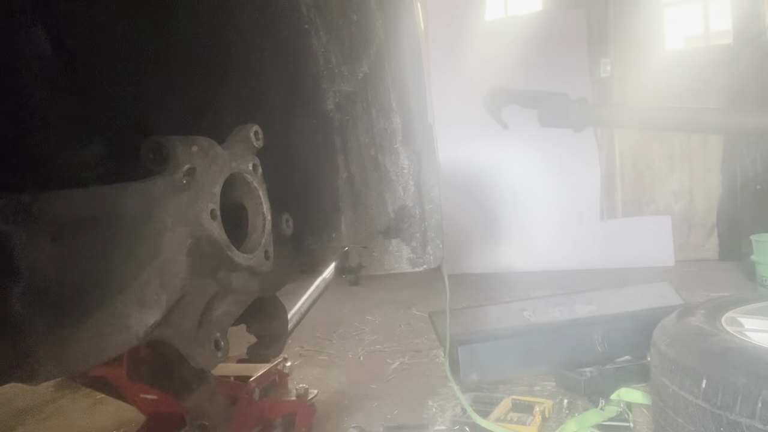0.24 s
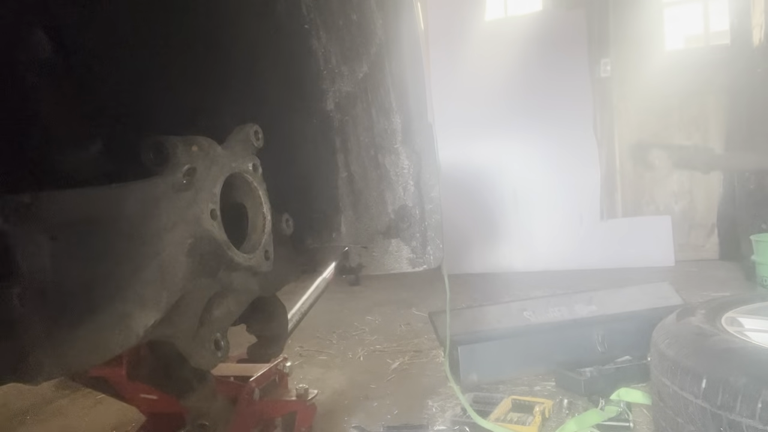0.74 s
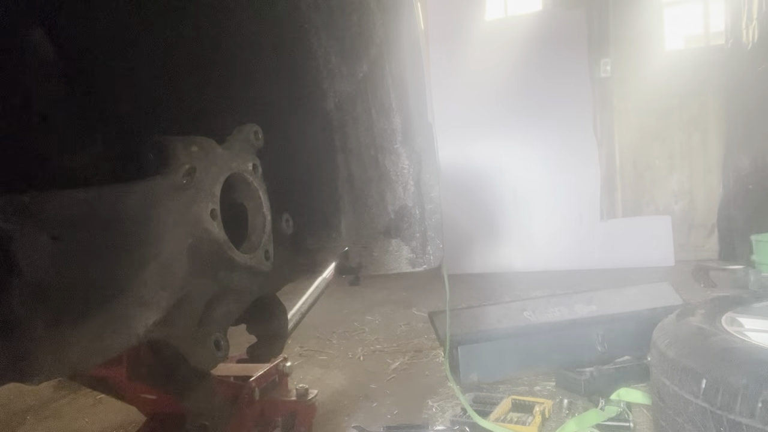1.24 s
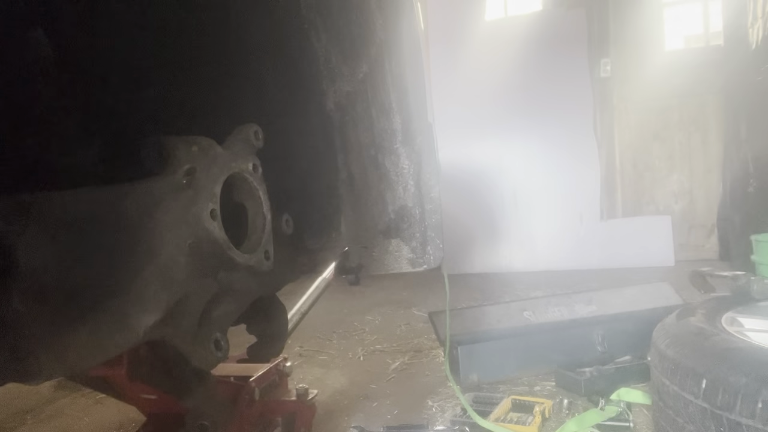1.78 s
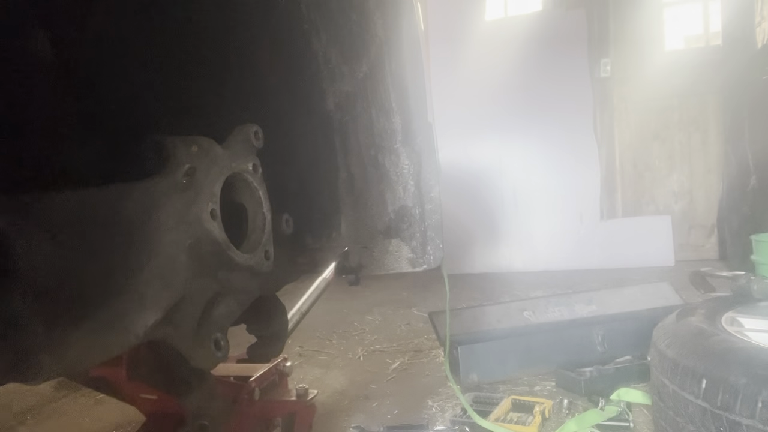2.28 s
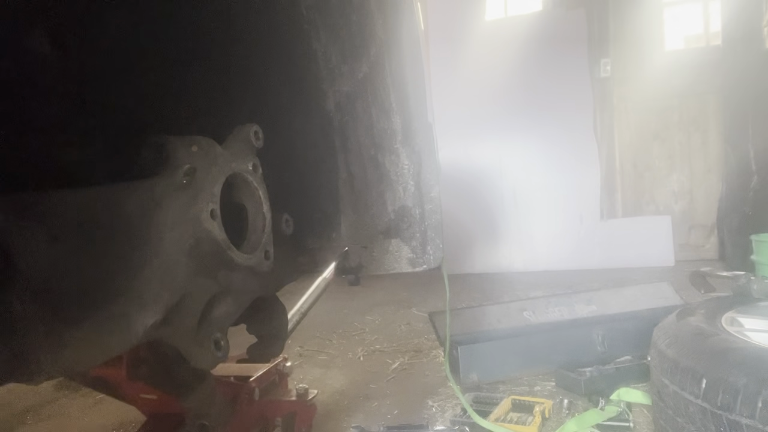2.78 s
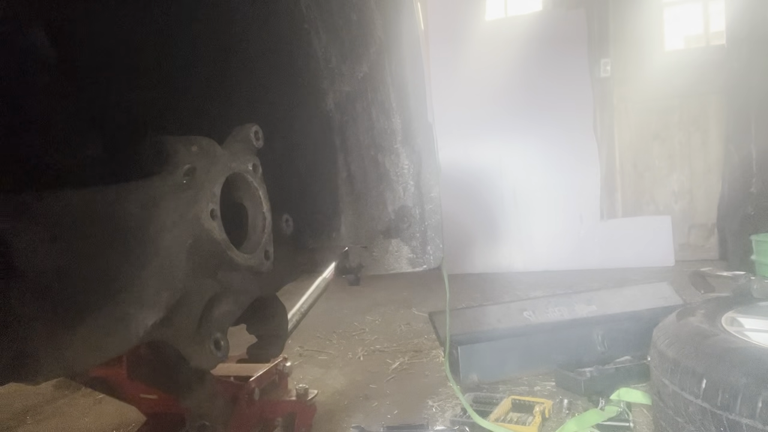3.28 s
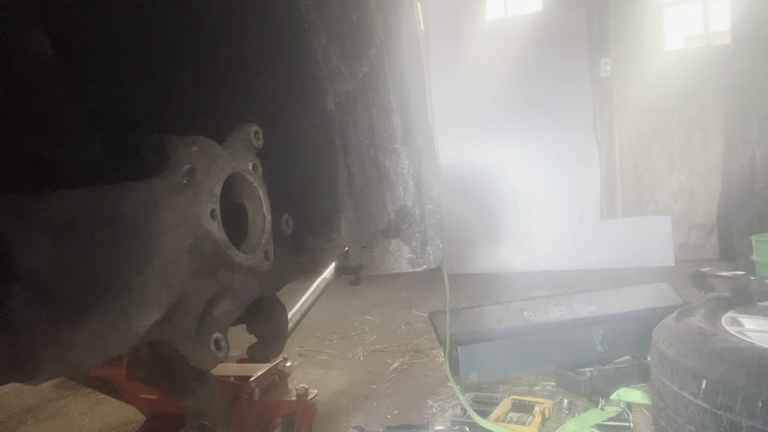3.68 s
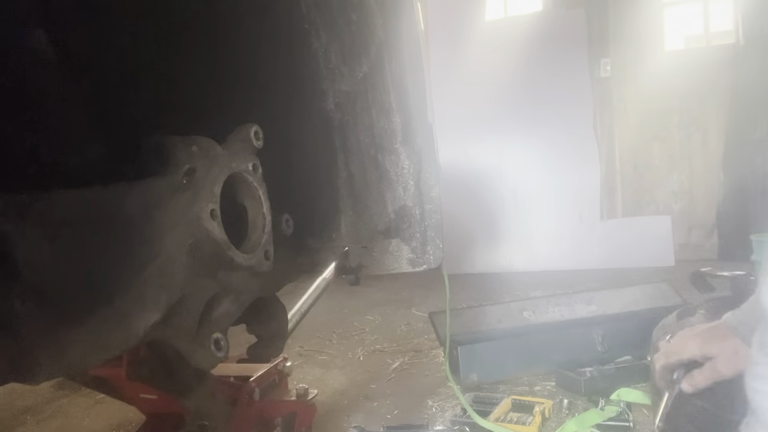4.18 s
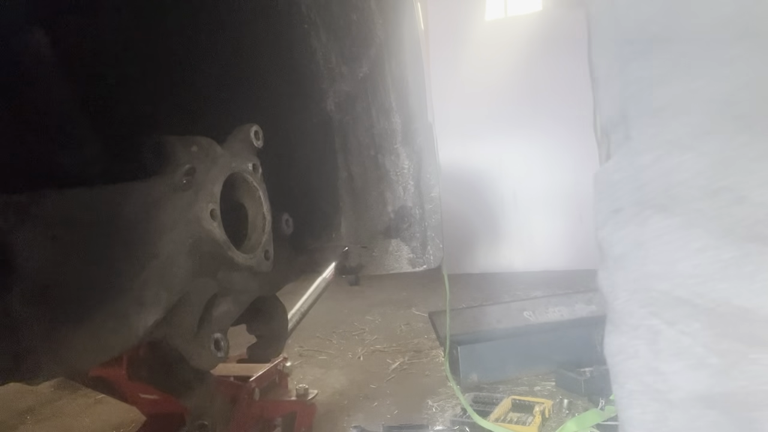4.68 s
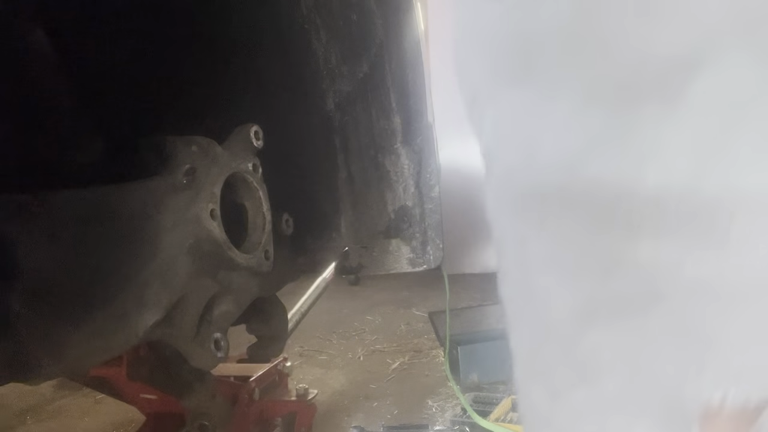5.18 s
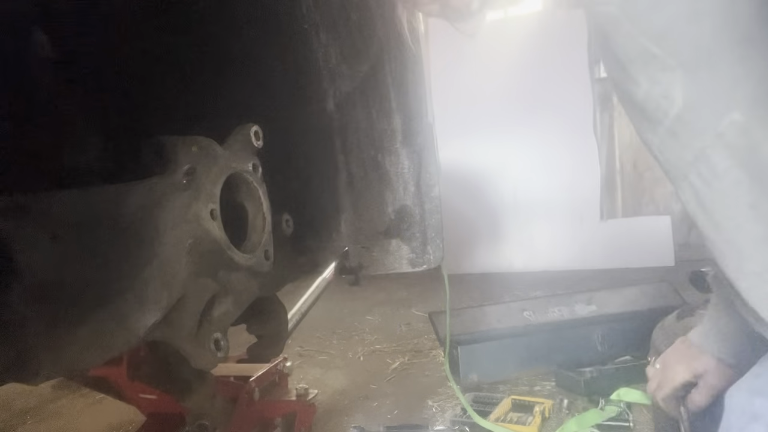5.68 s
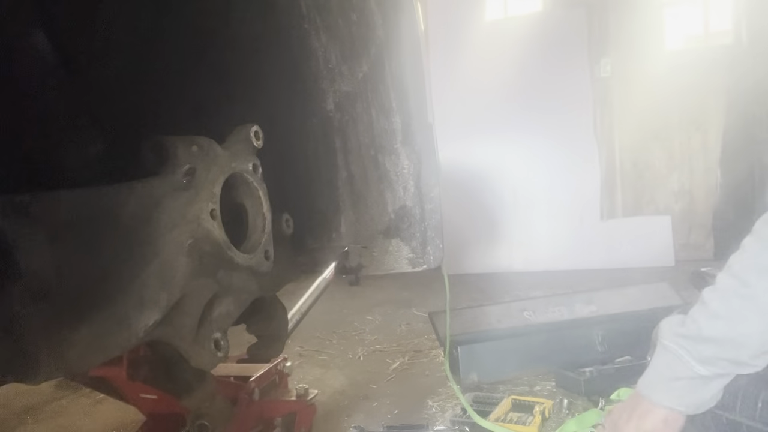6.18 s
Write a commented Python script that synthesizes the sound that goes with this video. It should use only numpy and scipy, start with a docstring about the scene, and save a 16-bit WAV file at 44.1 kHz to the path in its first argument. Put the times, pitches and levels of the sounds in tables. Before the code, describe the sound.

Home garage, close stereo microphone, short reverberation. At 0 s the bright steel ring of a blow struck just before is already dying, with five hard, low-pitched shaft knocks crowding the first 0.2 s and a small clatter among them. By 0.5 s only faint low rumble and shuffling remain. From 1.15 to 1.55 s the tool lands among loose parts: a grainy metallic clatter, with a hollow box thump near 1.33 s and a dull bump at 1.7 s. Quiet cloth sweeps and tiny ticks continue. Around 3.9-4.0 s the shaft is bumped, one firm knock with a low thud. Clothing rustle and rumble grow from 4.4 s, strongest around 5.2-5.7 s, crisp and close. A faint clink at 6.09 s precedes loud, sharp clanks at 6.19, 6.21 and 6.29 s, high steel rings fluttering and chattering until the abrupt end around 6.45 s.

```python
"""The ring of a slide hammer's last blow dies away in a home garage; its shaft bounces and the tool lands
among loose parts. Clothes rustle, the shaft is bumped, and the lifted tool's steel pieces clank at the end.
Metal is decaying sines, knocks are pulses and noise bursts, and chatter is random contacts through mode crowds.
Cloth and rumble are coloured flickering noise. A garage tail is added, then two microphone ports
give the lows and mids their width while both sides share one treble path."""
import sys
import numpy as np
from scipy import signal
from scipy.fft import rfft, irfft
from scipy.io import wavfile
from scipy.ndimage import uniform_filter1d

SR = 44100
rng = np.random.default_rng(int(sys.argv[2]) if len(sys.argv) > 2 else 0)


def store_wav(level_fs):
    """Save 16-bit WAV to argv[1]."""
    pcm = np.round(np.clip(np.atleast_2d(level_fs), -1, 1) * 32767)
    wavfile.write(sys.argv[1], SR, pcm.T.astype(np.int16))


N = 284004

# knocks on the shaft: t/s, pulse level/dB, pulse f/Hz, ring drive/dB, thud level/dB,
# start of the pair's beat/turns (0 loud, .5 silent)
KNOCKS = [(0.037, -14, 620, -24, -28.5, 0.033), (0.0857, -16, 614, -28, -46, 0.18),
          (0.1134, -15.5, 637, -23.5, -30, 0.87), (.149, -22, 860, -39, -45, 0.3),
          (0.1939, -23, 582, -40, -40.5, 0.043), (3.8775, -28, 673, -50.5, -43, .45),
          (3.967, -14.5, 827, -28, -29.5, 0.39), (3.987, -27.5, 605, -65, -45, 0.059)]
# spectrum of a hard crack: f/Hz, relative level/dB
CRACK = [(300, -3), (1000, 4), (2500, 3.5), (5000, 0), (8000, 0.5), (12000, -19), (16000, -15)]
# spectrum of floor and bench shaken by a knock: f/Hz, relative level/dB
THUD = [(40, -10), (100, -3), (300, -2), (700, -4), (1500, -15), (4000, -36)]
# likeness of the sound at the two ports: f/Hz, likeness (0 to 1)
SAME = [(60, 1), (300, 0.97), (700, 0.86), (1200, 0.083), (3000, 0.067), (6000, 0.19)]
# modes of the tool's steel pieces, each: f/Hz, relative level/dB, t60/s
HOOK = [(4230, 0, .04), (5130, -9, .04), (8600, -13, .03)]
COLLAR = [(9920, 0, .15), (11134, -8, .13), (11076, -9, .1), (10078, -10, .1), (7500, -12, .05),
          (14300, -18, .1)]
WEIGHT = [(6558, 0, .5), (6493, -20, .4), (6898, -25, .3)]
HANDLE = [(2419, 0, .9)]
TIP = [(12423, 0, .2)]
JAW = [(7197, 0, .5), (8005, -4, .5), (11189, -14, .6), (11614, -12, .5), (3110, -16, .25),
       (1036, -12, .08), (14900, -20, .2)]
ROD = [(9853, 0, .4), (7001, -1, .2), (7030, -2, .4), (12878, -4, .2), (4907, -9, .3), (5338, -12, .3),
       (13950, -16, .1)]
PIN = [(5140, 0, .06), (4574, -2, .08), (5420, -8, .05), (6300, -8, .05)]


def amp(db):
    """Turns decibels into an amplitude factor."""
    return 10 ** (np.asarray(db) / 20)


def evened(x):
    """Scales x to an RMS of one."""
    return x / np.sqrt(np.mean(x ** 2) + 1e-20)


def read(points, hz):
    """Reads a curve between its points along a logarithmic frequency axis."""
    f, value = np.transpose(points)
    return np.interp(np.log(hz + 1), np.log(f + 1), value)


def add(mix, s, sound):
    """Adds a sound into the mix at s seconds, cut at the end of the mix."""
    part = mix[round(s * SR):][:len(sound)]
    part += sound[:len(part)]


def shaped(x, gain):
    """Filters x by a function of frequency."""
    n = x.shape[-1]
    return irfft(rfft(x) * gain(np.fft.rfftfreq(n, 1 / SR)), n)


def wavering(count):
    """Smooth random curve of RMS one that changes over several milliseconds."""
    smooth = uniform_filter1d(rng.standard_normal(count), size=250)
    return evened(uniform_filter1d(smooth, size=250))


def ring(modes, length, spread_db, waver_db=0):
    """Decaying sines of random phase; the landing spot changes each level and a loose part wavers as it rocks."""
    t = np.arange(round(length * SR)) / SR
    luck = rng.random((len(modes), 2))
    out = 0
    for (hz, db, t60), (phase, spot) in zip(modes, luck):
        # every mode is lowered by 3 to 5 times the spread
        level_db = db + spread_db * (2 * spot - 5.0) + waver_db * wavering(len(t)) - 60 * t / t60
        out = out + amp(level_db) * np.sin(2 * np.pi * (hz * t + phase))
    return out


def burst(t60, colour=CRACK, rise=.0001, size=26460):
    """Coloured noise that swells briefly and dies away."""
    t = np.arange(size) / SR
    noise = evened(shaped(rng.standard_normal(len(t)), lambda f: amp(read(colour, f))))
    return noise * amp(-60 * t / t60) * (1 - np.exp(-t / rise))


def jangle(span_hz, t60, count=50):
    """A dense crowd of short modes at random pitches within a span, scaled to energy 1."""
    place, drop = rng.random((count, 2)).T
    low, high = span_hz
    modes = [(low * (high / low) ** a, -14 * b, t60) for a, b in zip(place, drop)]
    body = ring(modes, .25, 0)
    return body / np.linalg.norm(body)


def background():
    """Rumble and shuffling lie low after the ringing blow, then grow slowly, with cloth sweeps.
    The noise flickers in grains and patches."""
    # bed: t/s, rumble level/dB, shuffling level/dB, faint rustle level/dB
    bed = [(.4, -65, -76.5, -99), (.6, -67, -70.5, -91), (1.1, -66, -69, -82), (1.7, -60, -68.5, -89.5),
           (2.0, -59.5, -66.5, -90), (2.31, -58.5, -61, -84), (2.75, -60, -66, -92), (3.3, -60, -65, -80.5),
           (3.8, -60, -68.5, -76), (4.2, -58, -65.5, -77), (4.75, -56.5, -63.5, -75),
           (5.2, -51.5, -62.5, -68.5), (5.55, -51, -52.5, -59), (5.9, -54, -56, -60),
           (6.07, -53, -57.5, -64.5)]
    # spectra: f/Hz, relative level/dB
    rumble = [(20, -60), (32, -30.5), (45, 1.5), (65, 10), (110, -10.5), (160, -9.5), (300, -11),
              (500, -19.5), (900, -16.5), (3000, -59.5)]
    shuffling = [(150, -22.5), (400, 2.5), (1000, -2.5), (2500, -4), (5000, -11), (8000, -12.5),
                 (16000, -36.5)]
    rustling = [(1000, -36.5), (3000, -9), (6000, -1), (8000, 1.5), (11000, -0.5), (14000, -3.5),
                (16000, -6)]
    # depth of the time-frequency patches: rumble/dB, shuffling/dB, rustle/dB
    patch_depths = (1.4, 2., 0)
    frames, hz = N // 256 + 5, np.fft.rfftfreq(1024, 1 / SR)
    s, *levels = np.transpose(bed)
    t, out = np.arange(N) / SR, 0
    gains = [np.hypot(amp(np.interp(t, s, db)), swept) for db, swept in zip(levels, sweeps())]
    same = np.clip(read(SAME, hz), 0, 1)[:, None]
    layers = zip((rumble, shuffling, rustling), gains, (.8, 1.8, 2.5), patch_depths)
    for colour, gain, flicker_db, patch_db in layers:
        a, b, c, d, patches = rng.standard_normal((frames, 513, 5)).T
        patches = uniform_filter1d(patches, size=10, axis=0)
        patches = evened(uniform_filter1d(patches, size=3, axis=1))
        flicker = evened(uniform_filter1d(rng.standard_normal(frames), size=2))
        right = a + 1j * b
        left = same * right + np.sqrt(1 - same ** 2) * (c + 1j * d)
        z = np.array([left, right])
        z *= amp(read(colour, hz)[:, None] + flicker_db * flicker + patch_db * patches)
        noise = signal.istft(z, nperseg=1024, noverlap=768)[1][:, :N]
        out = out + gain * evened(noise)
    return out


def last_blow():
    """Steel modes and a noisy wash, both still dying from a blow just before the start."""
    # modes: f/Hz, relative level/dB, t60/s
    modes = [(1218, -5, .27), (1330, -11, .35), (1598, -3, .25), (1960, -12, .3), (2099, -14, .3),
             (2295, -16, .3), (3101, -13, .35), (3402, -13, .3), (3650, -14, .3), (4460, -14, .25),
             (5650, -12, .25), (7009, -12, .3), (7200, -6, .3), (8007, -9, .38), (9845, -8, .2),
             (10780, -16, .25), (11189, -17, .45), (11603, 0, .4), (14600, -20, .3)]
    ring_db, wash_db, wash_t60 = -25.5, -32.5, 0.46  # dB, dB, s
    out = np.zeros(N)
    tones = amp(ring_db) * ring(modes, .6, 0, 0.88)
    add(out, 0, tones + amp(wash_db) * burst(wash_t60))
    return out


def shaft():
    """Each knock: a pulse of a cycle or two, a thud after it, a tick, and the higher bending modes of the bar."""
    # bending modes: f/Hz, relative level/dB, t60/s
    bending = [(3100, -17, .13), (3663, -17, .1), (4890, -14, .24), (6562, -7, .07), (8637, -2, .11),
               (10850, -8, .09), (12031, -16, .1), (14360, -16, .1)]
    out, t = np.zeros(N), np.arange(400) / SR
    for s, db, hz, ring_db, thud_db, _ in KNOCKS:
        cycles = hz * t - 1.2
        add(out, s, amp(db) * np.cos(2 * np.pi * cycles) * np.exp(-(cycles / 0.58) ** 2))
        add(out, s + 0.00209, amp(thud_db) * burst(0.12, THUD, 0.0012, size=12000))
        add(out, s + .0008, amp(ring_db) * ring(bending, .25, 1.2, 3.5))
        add(out, s + .0008, amp(ring_db - 3) * burst(.008, size=1000))
    return out


def pair():
    """The shaft's lowest bending mode is a close pair that beats, and is muted once the shaft settles."""
    # the pair: f/Hz, split/Hz, level against the ring drive/dB, t60/s
    pair_hz, split_hz, pair_db, t60 = (2572, 8.5, -12, .5)
    free_s, settled_db = .095, -12  # rings free this long, then is turned down on its rest
    out, t = np.zeros(N), np.arange(SR // 2) / SR
    muted_db = settled_db * np.clip((t - free_s) / .008, 0, 1)
    for s, _, _, ring_db, _, turns in KNOCKS:
        beat = np.cos(np.pi * (split_hz * t + turns)) * np.sin(2 * np.pi * pair_hz * t)
        level_db = ring_db + pair_db + muted_db + 3 * wavering(len(t)) - 60 * t / t60
        add(out, s, amp(level_db) * beat)
    return out


def parts():
    """Each clatter is a grainy jostle that shakes the known modes of the loose parts and a crowd of small ones."""
    # modes of the loose parts: f/Hz, relative level/dB, t60/s
    part_modes = [(1518, -13, .06), (2309, -7, .07), (2592, -6, .07), (2756, -10, .05), (3302, -6, .05),
                  (3550, -5, .04), (3660, -9, .07), (4290, -8, .05), (4500, 0, .09), (4760, -5, .06),
                  (5394, -8, .08), (5500, -3, .12), (5857, -6, .18), (6100, -12, .12), (7200, -13, .05),
                  (6761, -2, .06), (7776, -9, .05), (9685, -13, .16), (10200, -13, .2), (11560, -7, .14),
                  (12040, -12, .12)]
    # clatters: t/s, drive/dB, crack level against the drive/dB, t60 of the jostling/s
    clatters = [(.122, -39, -9, .06), (1.1459, -40, -7, 0.061), (1.1579, -39.5, -9, 0.032),
                (1.1712, -34, -6, 0.036), (1.186, -41, 1, 0.042), (1.1979, -31, -4, 0.05),
                (1.215, -47, 9, 0.087), (1.2292, -41, 0, 0.025), (1.247, -45.5, 3.5, 0.062),
                (1.275, -50.5, -2, 0.085), (1.3387, -37.5, -22, 0.096), (1.382, -43.5, 5, 0.052),
                (1.4853, -35, 0.5, 0.039), (1.5081, -47.5, 8, 0.068), (1.5531, -51, -6, 0.09)]
    # small modes of the heap, new at every clatter: Hz, s, dB
    heap_hz, heap_t60, heap_db = (2200, 12500), 0.07, -2.5
    out = np.zeros(N)
    for s, db, crack_db, t60 in clatters:
        jostle = burst(t60, CRACK, .0007, size=9000)
        body = ring(part_modes, .25, 3, 3.5)
        grain = evened(uniform_filter1d(rng.standard_normal(len(jostle)), size=40))
        jostle = jostle * amp(4.0 * grain - 1.5)
        body = body / np.linalg.norm(body) + amp(heap_db) * jangle(heap_hz, heap_t60)
        add(out, s, amp(db) * signal.fftconvolve(jostle, body))
        add(out, s, amp(db + crack_db) * jostle)
    return out


def sweeps():
    """Gains for rumble (none), shuffling and rustle: each sweep of cloth rises, holds and fades."""
    # strokes of cloth: start t/s, time to the fade/s, rustle level/dB, shuffling level/dB
    strokes = [(0.777, 0.13, -80, -64.5), (0.981, .01, -76, -68), (1.104, 0.029, -71, -67),
               (1.817, 0.011, -73, -69), (1.939, .02, -71.5, -68), (2.256, 0.069, -80, -63.5),
               (2.788, 0.058, -60, -68), (2.892, 0.082, -66, -69), (3.406, 0.091, -65, -65.5),
               (3.666, 0.06, -76, -68.5), (4.381, 0.062, -58.5, -74), (4.452, 0.072, -57.5, -78),
               (4.59, 0.025, -54.5, -62.5), (4.65, 0.034, -65.5, -63), (4.78, 0.18, -63, -61.5),
               (5.172, 0.009, -53, -56.5), (5.241, 0.2, -47, -56.5), (5.373, 0.11, -49.5, -60),
               (5.603, 0.055, -54, -57), (5.677, 0.21, -67, -55)]
    rise_share, fade_db_per_s = 0.25, 340  # rise as a share of the hold
    t, shuffle, rustle = np.arange(N) / SR, 0, 0
    for s, hold, rustle_db, shuffle_db in strokes:
        rise = np.clip((t - s) / (rise_share * hold), 0, 1)
        shape = rise * amp(-fade_db_per_s * np.maximum(t - s - hold, 0))
        # overlapping strokes add as powers
        shuffle = shuffle + (shape * amp(shuffle_db)) ** 2
        rustle = rustle + (shape * amp(rustle_db)) ** 2
    return 0, np.sqrt(shuffle), np.sqrt(rustle)


def bumps():
    """Low damped pushes; the hollow box rings, each mode wavering as it rocks, over a thud."""
    # dull bumps on floor and bench: t/s, level/dB, f/Hz, t60/s
    pushes = [(1.229, -39.5, 101, 0.14), (1.341, -35.5, 87, 0.27), (1.712, -35.5, 252, 0.041),
              (3.972, -21.5, 290, 0.039), (3.976, -35.5, 62.3, 0.11), (4.004, -37, 700, .04),
              (4.862, -38.5, 54.2, 0.16), (5.035, -35.5, 240, 0.047), (6.218, -36, 144.8, 0.4)]
    # modes of the hollow box under the laid-down tool: f/Hz, relative level/dB, t60/s
    box_modes = [(209, -1, .11), (406, -9, .36), (520, -10, .15), (605, -10, .2), (802, -13, .2),
                 (942, -3, .38), (1180, -13, .15), (1420, -11, .15), (1582, -12, .24), (1810, -17, .1)]
    # strike on the box: t/s, level/dB
    box_s, box_db = (1.332, -26)
    out, t = np.zeros(N), np.arange(SR // 2) / SR
    for s, db, hz, t60 in pushes:
        push = amp(db - 60 * t / t60) * np.sin(2 * np.pi * hz * t)
        add(out, s, push * (1 - np.exp(-t / 0.00036)))
    box = ring(box_modes, .5, 0, 1.8) * (1 - np.exp(-t / 0.005))
    thud = amp(-9.0) * burst(0.38, THUD, 0.003)[:len(t)]
    add(out, box_s, amp(box_db) * (box + thud))
    return out


def ticks():
    """Small ticks of cloth and grit: short decaying noise with a broad tint."""
    # clicks: t/s, level/dB, centre f/Hz
    clicks = [(2.1051, -51, 1070), (2.496, -52, 2410), (2.7022, -55.5, 3030), (2.846, -46, 9620),
              (4.6036, -43, 10400), (4.816, -45, 1300), (5.147, -51, 1700), (5.1755, -41, 2300),
              (5.3117, -34, 11800), (5.3844, -41, 11300), (5.7073, -47, 6000), (5.827, -48, 2500),
              (5.87, -50, 2600), (5.896, -51, 2900), (5.976, -54, 2300), (6.058, -50, 2360)]
    out, t = np.zeros(N), np.arange(900) / SR
    for s, db, hz in clicks:
        noise = rng.standard_normal(len(t))
        tint = shaped(noise, lambda f: 1 / (1 + (np.log((f + 1) / hz) / 0.3) ** 2))
        add(out, s, amp(db - 60 * t / 0.014) * evened(tint))
    return out


def rings():
    """Every touch drives or damps one piece from its old ring to a new one; where it lands changes the overtones.
    The loose pieces chatter, so every ring flutters."""
    # strikes, scrapes and mutes: t/s, piece, ring level it leads to/dB, time constant of the change/s
    contacts = [(6.087, WEIGHT, -48.5, 0.00068), (6.1877, HOOK, -9.5, 0.00065), (6.188, TIP, -16.5, 0.0011),
                (6.1876, ROD, -34, .001), (6.1878, JAW, -32, 0.00088), (6.213, WEIGHT, -10, 0.00081),
                (6.2132, COLLAR, -14, 0.0025), (6.2132, ROD, -22, .001), (6.2112, HANDLE, -30.5, 0.0036),
                (6.1876, PIN, -25.5, .001), (6.2132, PIN, -18.5, .002), (6.222, WEIGHT, -25, 0.0018),
                (6.224, TIP, -28, .004), (6.196, HOOK, -23.5, 0.0037), (6.235, COLLAR, -12, 0.0029),
                (6.23, HANDLE, -18, 0.02), (6.255, HANDLE, -11, 0.02), (6.25, PIN, -17, .003),
                (6.275, PIN, -21.5, .004), (6.25, ROD, -20, 0.0065), (6.25, JAW, -24, 0.0033),
                (6.268, TIP, -17, 0.018), (6.2904, TIP, -22, .002), (6.265, WEIGHT, -34, .005),
                (6.265, COLLAR, -28, .008), (6.265, HOOK, -34, .006), (6.278, WEIGHT, -5.5, 0.0088),
                (6.278, ROD, -42.5, .005), (6.2901, ROD, -16, 0.0015), (6.292, HANDLE, -31, 0.012),
                (6.31, WEIGHT, -5.5, 0.0092), (6.31, TIP, -48, .012), (6.31, ROD, -23, .006),
                (6.311, JAW, -22, 0.002), (6.327, JAW, -21.5, 0.0025), (6.328, HANDLE, -38, .01),
                (6.333, WEIGHT, -44, 0.011), (6.342, HOOK, -22, 0.002), (6.342, JAW, -25, 0.017),
                (6.361, WEIGHT, -12.5, 0.015), (6.36, ROD, -23.5, 0.0062), (6.385, ROD, -30.5, 0.0097),
                (6.352, HANDLE, -50, 0.005), (6.378, HANDLE, -42, .003), (6.398, WEIGHT, -31.5, 0.0068),
                (6.42, WEIGHT, -24.5, 0.0036)]
    out, start = np.zeros(N), contacts[0][0]
    t = np.arange(start, N / SR, 1 / SR)
    for piece in (HOOK, PIN, TIP, COLLAR, WEIGHT, HANDLE, ROD, JAW):
        touches = [row for row in contacts if row[1] == piece]
        for m, (hz, db, t60) in enumerate(piece):
            level = np.zeros(len(t))
            spot = rng.standard_normal(len(touches)) * (m > 0)  # the first mode keeps its level
            for (s, _, ring_db, rise), luck in zip(touches, spot):
                since = np.maximum(t - s, 0)
                new = amp(ring_db + db + 2.2 * luck - 60 * since / t60)
                level += (new - level) * (1 - np.exp(-since / abs(rise)))
            flutter = wavering(len(t)) * (1 if m else .45)
            tone = np.sin(2 * np.pi * (hz * t + rng.random()) + 0.6 * flutter)
            add(out, start, level * amp(3.3 * flutter) * tone)
    return out


def clanks():
    """Each knock cracks, jangles the whole tool and sends a thud into the floor."""
    # cracks as the pieces knock together: t/s, level/dB, lowest f of the crack/Hz
    cracks = [(6.088, -38.5, 4000), (6.1881, -16.5, 3200), (6.2135, -10.5, 2400), (6.221, -23.5, 2500),
              (6.237, -22, 4300), (6.249, -24, 4600), (6.2886, -15, 4300), (6.312, -30, 3000),
              (6.342, -29, 3800), (6.418, -32.5, 3000)]
    # faint overtones of the whole tool, spread at random: Hz, s, dB
    jangle_hz, jangle_t60, jangle_db = (3638, 14970), 0.1146, -7
    out, body = np.zeros(N), jangle(jangle_hz, jangle_t60)
    for s, db, low_hz in cracks:
        add(out, s, amp(db + jangle_db) * signal.fftconvolve(burst(0.02, size=4000), body))
        crack = shaped(burst(0.018, size=4000), lambda f: 1 / (1 + (low_hz / (f + 1)) ** 5))
        rattle = evened(uniform_filter1d(rng.standard_normal(len(crack)), size=40))
        add(out, s, amp(db + 2.5 * rattle) * crack)
        add(out, s, amp(db - 26) * burst(0.25, THUD, 0.0015))
    return out


def chatter():
    """Tiny contacts at random moments, each ringing one of three crowds of overtones and, faintly, lower ones."""
    # chatter of the lifted tool's pieces: t/s, level/dB
    s, db = np.transpose([(6.19, -45.5), (6.214, -29), (6.26, -28.5), (6.3, -33.5), (6.34, -41.5),
                          (6.44, -46.5)])
    contacts_per_s, spread_db = 900, 3.5  # the rate is shared by the three crowds
    out = np.zeros(N)
    t = np.arange(s[0], N / SR, 1 / SR)
    for _ in range(3):
        size = amp(spread_db * rng.exponential(1, len(t)))
        size = size * (rng.random(len(t)) < contacts_per_s / 3 / SR)
        contacts = evened(size * rng.choice([-1., 1.], len(t))) * amp(np.interp(t, s, db))
        add(out, s[0], signal.fftconvolve(contacts, jangle((4400, 15000), 0.076, count=24)))
        add(out, s[0], amp(-19.) * signal.fftconvolve(contacts, jangle((1300, 4400), .07, count=10)))
    return out


def garage(x):
    """Sparse taps of random sign, each band dying at its own speed; the ports hear nearly the same lows."""
    # decay of the room: f/Hz, t60/s
    decay = [(100, 0.67), (500, 0.34), (2000, 0.46), (6000, 0.28), (15000, 0.062)]
    taps = np.zeros((2, SR // 2))
    at = np.arange(120, SR // 2 - 20, 20)
    at = at + rng.integers(0, 20, (2, len(at)))
    np.put_along_axis(taps, at, rng.choice([-1., 1.], at.shape), 1)
    hz, t, (other, right) = signal.stft(taps, SR, nperseg=256)
    same = np.clip(read(SAME, hz), 0, 1)[:, None]
    z = np.array([same * right + np.sqrt(1 - same ** 2) * other, right])
    tail = signal.istft(z * amp(-60 * t / read(decay, hz)[:, None]), SR, nperseg=256)[1]
    return signal.fftconvolve(x[None], tail / np.linalg.norm(tail[0]), axes=1)[:, :N]


def scene():
    """Balances the direct sounds left and right, and adds the garage tail and the background."""
    far, bar = last_blow() + shaft() + bumps() + parts(), pair()
    tool, tones = clanks() + chatter(), rings()
    near = (tool + tones) * amp([[-3.5], [0]]) + ticks()
    wet = amp(-9.5) * far + amp(-14.0) * tool + amp(-23) * (tones + bar)
    return (far + bar) * amp([[-2.5], [0]]) + near + garage(wet) + background()


def record(dry):
    """The ports differ in phase and level; the treble comes from one port and reaches the right a moment later."""
    # phase by which the left port lags: f/Hz, lag/rad
    port_phase = [(40, .2), (125, .35), (300, .8), (500, 1.5), (750, 2.4), (1100, 1.5), (2400, 1.5),
                  (4500, 0), (5500, 0), (6500, -1.2), (7500, -2.4)]
    # left port's gain below the shared treble: f/Hz, level/dB
    port_db = [(200, 2.5), (900, -1.5), (2400, 1.5), (5000, -1.5)]
    treble_lag_s, treble_hz, edge_hz = 1 / 5430, 6700, 15950
    hz = np.fft.rfftfreq(N, 1 / SR)
    left, right = rfft(dry)
    high = 1 / (1 + (treble_hz / (hz + 1)) ** 12)
    left = left * np.exp(-1j * read(port_phase, hz)) * amp(read(port_db, hz))
    late = np.exp(-2j * np.pi * hz * treble_lag_s)
    bass_cut = 1 / (1 + (40 / (hz + 1)) ** 8)
    # dividing by the delay moves the left treble ahead of the right
    left = (1 - high) * left + high * right / late
    ports = irfft(np.array([bass_cut * left, bass_cut * right]), N)
    lowpass = signal.firwin(511, edge_hz, window=("kaiser", 9), fs=SR)
    return signal.oaconvolve(ports, lowpass[None], "same")


dry = scene()
out = record(dry)
store_wav(out)
```